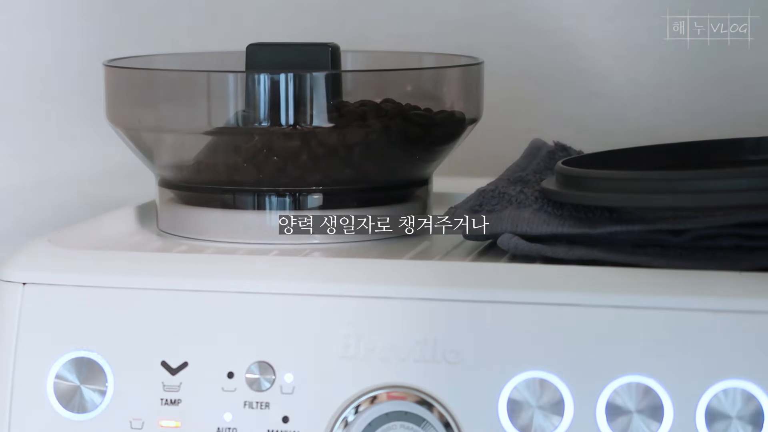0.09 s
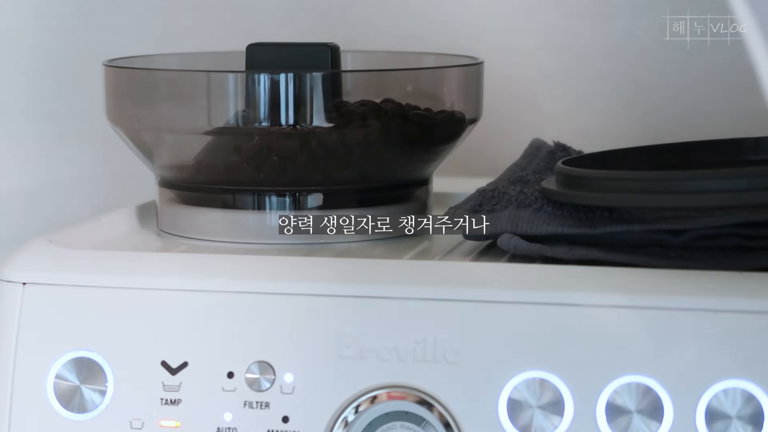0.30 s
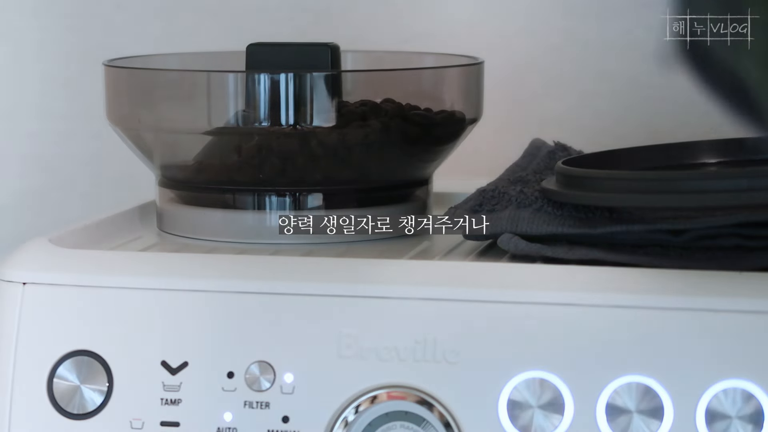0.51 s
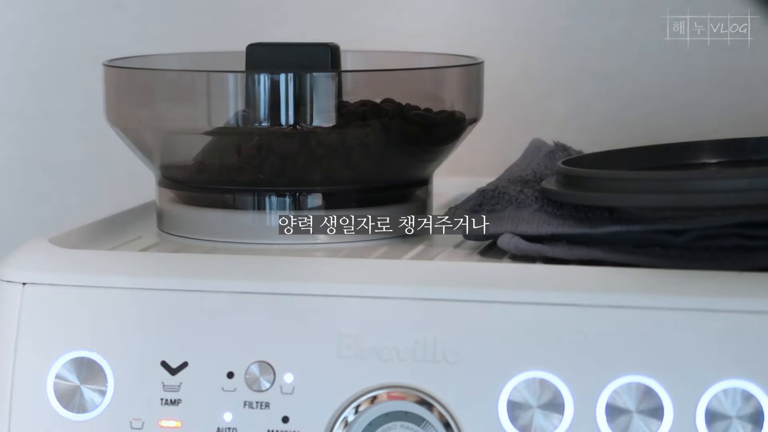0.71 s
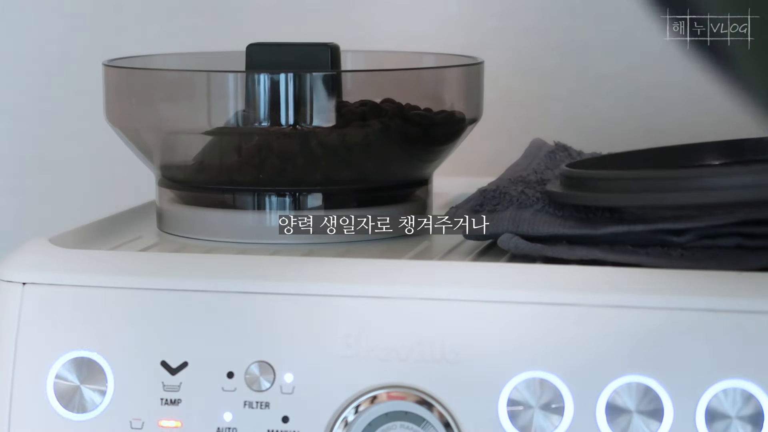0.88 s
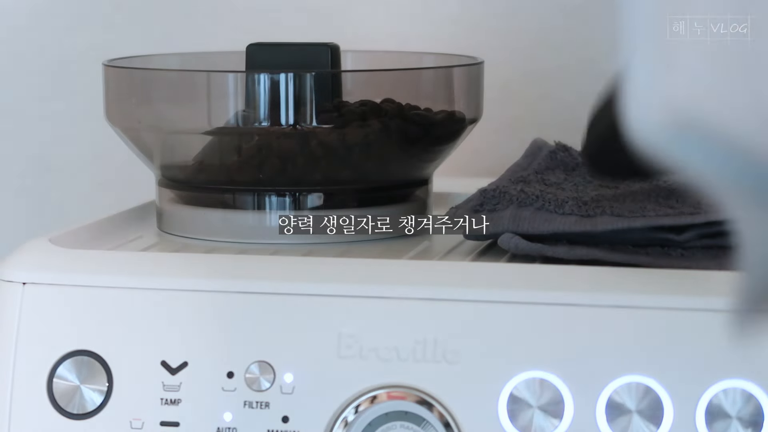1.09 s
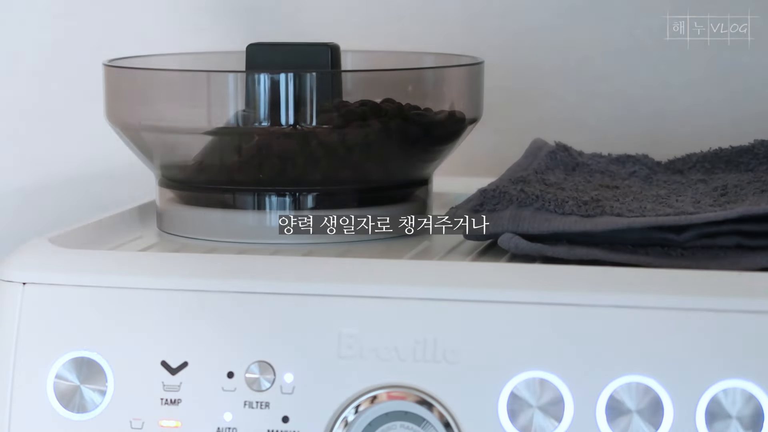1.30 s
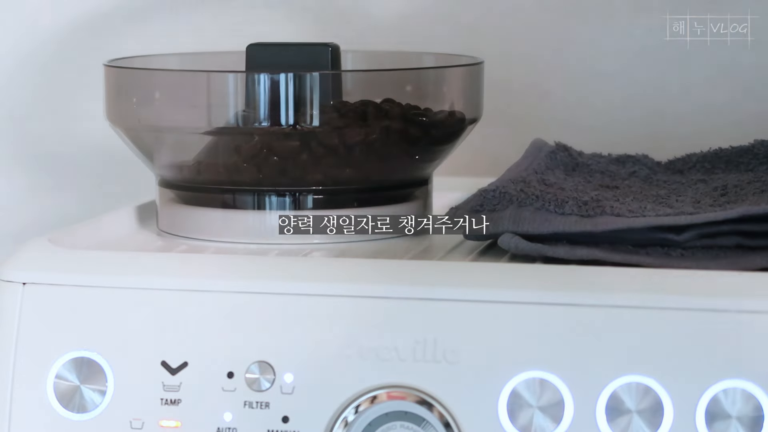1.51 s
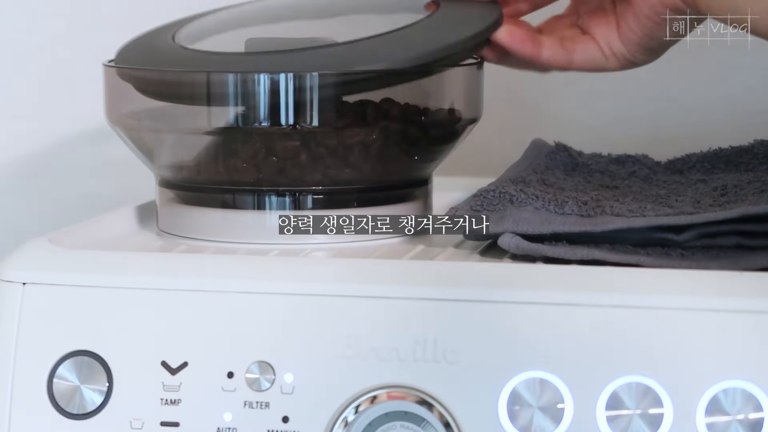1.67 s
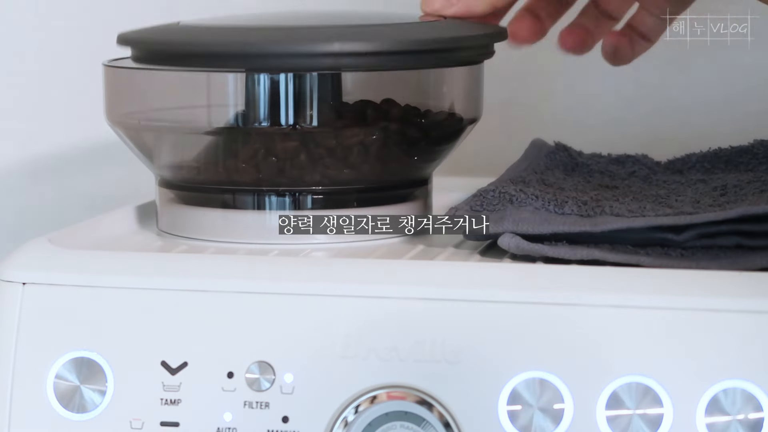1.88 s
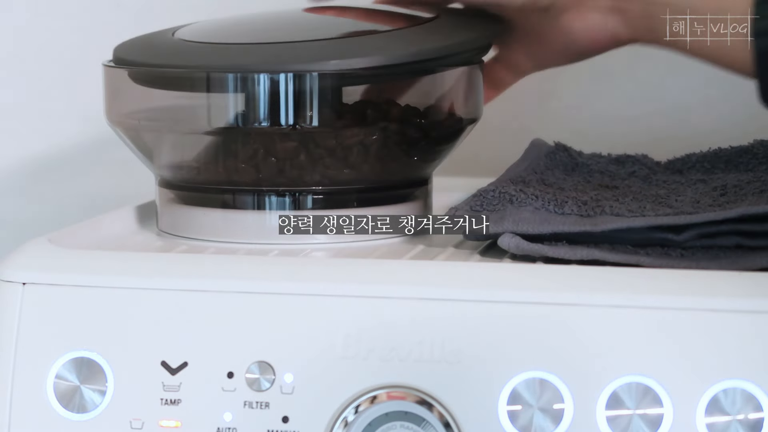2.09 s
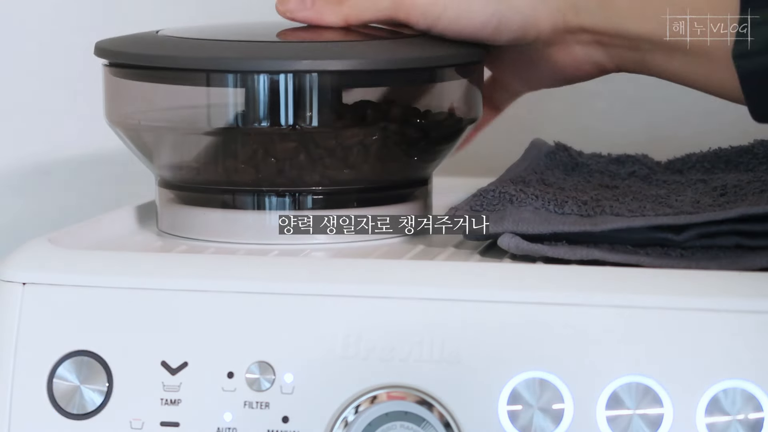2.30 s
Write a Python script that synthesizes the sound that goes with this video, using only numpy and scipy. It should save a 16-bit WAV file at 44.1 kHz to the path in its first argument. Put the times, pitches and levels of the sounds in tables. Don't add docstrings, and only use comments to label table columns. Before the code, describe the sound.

A plastic lid claps onto a bean hopper and is pressed down with dull clicks, after a container shuffles and knocks hard on the counter; close microphone, small quiet kitchen with faint fridge hum.

```python
import sys
import numpy as np
from scipy import signal
from scipy.fft import rfft, irfft
from scipy.io import wavfile

SR = 44100
rng = np.random.default_rng(int(sys.argv[2]) if len(sys.argv) > 2 else 0)


def store_wav(level_fs):
    pcm = np.round(np.clip(np.atleast_2d(level_fs), -1, 1) * 32767)
    wavfile.write(sys.argv[1], SR, pcm.T.astype(np.int16))


def convert_level_to_amplitude(level_db):
    exponent = np.asarray(level_db, float) / 20
    return 10 ** exponent


N = 110250
SEAT_S = 2.0

# start in seconds, mid crack in dB, body in dB, bright crack in dB, chatter in seconds.
LID_CONTACTS = [(1.7123, -24.5, -21, -32, 0.0013), (1.7176, -20, -43, -29, 0.0036),
                (1.7227, -51, -28, -28, 0.0013), (1.7645, -26.5, -22, -33, 0.0073),
                (1.77, -44, -32.5, -28.5, 0.0082), (1.7747, -38, -26, -41, 0.005),
                (1.781, -52, -28, -27, 0.0019), (1.785, -47, -52, -24, 0.0023),
                (2.1184, -42, -43.5, -47, 0.009), (2.1351, -40, -51, -37, 0.0035),
                (2.1532, -52, -53, -46, 0.0029), (2.168, -36.5, -44, -36, 0.0055),
                (2.1727, -47, -50, -35, 0.0028), (2.2615, -66, -43, -66, 0.0027),
                (2.3886, -38, -65, -46, 0.0044), (2.397, -37.5, -54, -37.5, 0.0056),
                (2.404, -34.5, -66, -35, 0.0045)]
# frequency in Hz, side level in dB.
SIDE_COLOUR = [(100, -29), (700, -19), (2400, -11.5), (8100, 1.5), (15000, 8)]


def colour(x, points):
    p, n = np.array(points, float), x.shape[-1]
    hz = np.maximum(np.arange(n // 2 + 1) * SR / n, 1)
    gain_db = np.interp(np.log(hz), np.log(p[:, 0]), p[:, 1])
    return irfft(rfft(x) * convert_level_to_amplitude(gain_db), n)


def band(x, lo_hz, hi_hz):
    return signal.sosfilt(signal.butter(N=2, Wn=[lo_hz, hi_hz], btype="band", fs=SR, output="sos"), x)


def unit(x):
    return x / np.sqrt(np.mean(x ** 2))


def peak_one(x):
    return x / np.abs(x).max()


def ring(modes, signs, size=8192):
    t = np.arange(size) / SR
    y = 0
    for (hz, db, t60), sign in zip(modes, signs):
        y = y + sign * convert_level_to_amplitude(db) * np.sin(2 * np.pi * hz * t) * convert_level_to_amplitude(-60 * t / t60)
    return peak_one(y)


def contacts(rows, modes, mid_db, body_db, bright_db, rim_db, rise_s, tick, size=8192):
    # frequency in Hz, level in dB, decay time T60 in seconds.
    rim_modes = [(2900, -4, .012), (4500, 0, .012), (6080, 0, .015), (7500, -3, .012), (9400, -5, .01)]
    ticks_per_s = 4000
    soft_tilt = 0.25
    out, t = np.zeros(N + 2 * size), np.arange(size) / SR
    blow = t * np.exp(-t / rise_s)
    for s, mid, body, bright, chatter_s in rows:
        chance = rng.random(size)
        noise = rng.standard_normal((2, size))
        body_vary, rim_vary, detune = rng.standard_normal((3, 14))
        fade = peak_one(np.exp(-t / max(chatter_s, 2e-4)) * (1 - np.exp(-t / rise_s)))
        push = fade * (noise[0] * (chance < ticks_per_s / SR) + 0.38 * noise[1])
        push[0] = -tick
        mid_crack = band(band(push, 900, 3500), 700, 4500)
        bright_crack = band(band(push, 3300, 10000), 2800, 15000)
        tilt = np.clip(soft_tilt * (body - mid), -4, 4)
        struck = [(hz * (1 + 0.057 * j), db - tilt * np.log2(hz / 500), t60)
                  for (hz, db, t60), j in zip(modes, detune)]
        force = 0.1 * push + blow / blow.sum()
        body_ring = signal.fftconvolve(force, ring(struck, -convert_level_to_amplitude(1.5 * body_vary)))[:size]
        rim_ring = signal.fftconvolve(push, ring(rim_modes, convert_level_to_amplitude(2.5 * rim_vary)))[:size]
        i = int(s * SR)
        out[i:i + size] += convert_level_to_amplitude(mid + mid_db) * peak_one(mid_crack)
        out[i:i + size] += convert_level_to_amplitude(body + body_db) * peak_one(body_ring)
        out[i:i + size] += convert_level_to_amplitude(bright + bright_db) * (peak_one(bright_crack) + convert_level_to_amplitude(rim_db) * peak_one(rim_ring))
    return out[:N]


def friction(curve, points, trim_db, grit_db):
    c, t = np.array(curve), np.arange(N) / SR
    unevenness = rng.exponential(size=N // 40 + 1).repeat(40)[:N]
    grains = rng.standard_normal(N) * convert_level_to_amplitude(grit_db * unevenness)
    pressure_db = np.interp(t, c[:, 0], c[:, 1], left=-120, right=-120)
    return unit(colour(grains, points)) * convert_level_to_amplitude(pressure_db + trim_db)


def notes(rows, rough, size=8192):
    out, t = np.zeros(N + size), np.arange(size) / SR
    for s, hz, db, scrape_s, t60 in rows:
        noise = np.sqrt(SR * scrape_s / 20) * rng.standard_normal(size)
        slip = np.sin(2 * np.pi * hz * t) + rough * noise
        scrape = slip * np.sin(np.pi * np.clip(t / scrape_s, 0, 1))
        y = signal.fftconvolve(scrape, ring([(hz, 0, t60)], (1,)))[:size]
        i = int(s * SR)
        out[i:i + size] += convert_level_to_amplitude(db) * peak_one(y)
    return out[:N]


def wander(rate_hz):
    return unit(signal.resample(rng.standard_normal(int(rate_hz * N / SR) + 2), N))


def air():
    # frequency in Hz, level in dB.
    air_colour = [(15, -32), (25, -11), (48, -7.5), (148, -15), (240, -10), (359, -15), (743, -15.5),
                  (12500, -43.5), (15600, -67)]
    # frequency in Hz, side minus mid in dB.
    air_side = [(60, -24), (200, -5), (400, -5.5), (4400, 0.5)]
    # time in seconds, swell in dB.
    air_swell = [(.7, 0), (1.0, 0), (1.4, 1), (1.7, -0.5), (2.0, -0.5), (2.5, -0.5)]
    # frequency in Hz, level in dB, frequency wander in Hz.
    hum_lines = [(57.7, -65, 2.82), (85, -73.5, 2.86), (111.4, -73, 2.1), (240.5, -60, 0.41),
                 (13100, -101, 2.5), (14600, -99, 1.5)]
    t = np.arange(N) / SR
    mid, side = colour(rng.standard_normal((2, N)), air_colour)
    level_db = -60.5 + np.interp(t, *np.array(air_swell).T)
    gain = convert_level_to_amplitude(level_db) / np.std(band(mid, 336, 18000))
    hum = 0
    for hz, db, wander_hz in hum_lines:
        level = convert_level_to_amplitude(db + 3 + 1.5 * wander(6))
        hum = hum + level * np.sin(2 * np.pi * np.cumsum(hz + wander_hz * wander(8)) / SR)
    return gain * mid + hum, gain * colour(side, air_side)


def shuffle():
    # time in seconds, level in dB.
    shuffle_curve = [(0, -44.5), (.035, -46), (.07, -46.5), (.12, -47.5), (.17, -45), (.215, -45.5)]
    # frequency in Hz, level in dB.
    shuffle_colour = [(88, -35), (150, -3), (459, -11), (1230, -5.5), (10800, -25.5), (15000, -22)]
    return friction(shuffle_curve, shuffle_colour, trim_db=-4.0, grit_db=-1.0)


def knocks():
    # start in seconds, mid crack in dB, body in dB, bright crack in dB, chatter in seconds.
    knock_rows = [(0.001, -33.5, -33.5, -61, 0.005), (0.029, -34, -33, -49, 0.0024),
                  (0.06, -33.5, -51, -39, 0.0063), (0.155, -41, -35, -49, 0.011),
                  (0.2208, -27.5, -26, -35, 0.012), (0.2262, -19, -20, -40, 0.0025),
                  (0.2455, -21.5, -22, -27, 0.0043), (0.2505, -18, -20.5, -26, 0.001),
                  (0.2574, -14.5, -24, -18.5, 0.0037), (0.263, -21, -36, -45, 0.0025),
                  (0.272, -22, -24, -44, 0.0033), (0.4016, -21, -19, -35.5, 0.0048),
                  (0.4065, -15.5, -30, -47, 0.001), (0.4392, -23, -27.5, -38, 0.007),
                  (0.452, -22.5, -29, -31, 0.0073), (0.4575, -30, -32, -25, 0.0045),
                  (0.4622, -11.5, -28, -21, 0.0028), (0.4655, -10.5, -17, -16, 0.0028),
                  (0.47, -37, -22.5, -36, 0.0038), (0.5018, -20.5, -22, -34, 0.0084),
                  (0.5065, -21, -22.5, -27.5, 0.0025), (0.534, -43, -21, -47, 0.0027)]
    # frequency in Hz, level in dB, decay time T60 in seconds.
    knock_modes = [(274, -21, 0.21), (343, -15.5, 0.09), (442, -10, 0.079), (503, 9, 0.044),
                   (677, 12, 0.022), (863, 4, 0.033), (967, -1.5, 0.065), (1288, 6, 0.025)]
    return contacts(knock_rows, knock_modes, mid_db=-1.0, body_db=-1.5, bright_db=1.5, rim_db=-57,
                    rise_s=0.000081, tick=3.26)


def rubbed_notes():
    # start in seconds, frequency in Hz, level in dB, scrape in seconds, T60 in seconds.
    knock_notes = [
        (.2215, 885, -22.5, .005, 0.028),
        (0.223, 440, -34, 0.0043, 0.026),
        (0.401, 422, -17, 0.0029, 0.022),
        (0.454, 1310, -21.5, 0.013, .015),
        (.453, 2120, -22, 0.0052, .01),
        (0.4615, 996, -22, 0.0053, 0.025),
        (.502, 420, -25.5, 0.0064, 0.034),
        (.548, 437, -35, .008, 0.037),
    ]
    lid_notes = [(1.0385, 1300, -30, .006, .012), (1.047, 870, -42.5, 0.0088, 0.022),
                 (1.044, 2010, -46, .004, .012), (1.2, 880, -55.5, .006, 0.03),
                 (1.7125, 363, -26.5, 0.0034, 0.027), (1.716, 256, -29, 0.0078, 0.068),
                 (1.7125, 590, -29.5, 0.0037, 0.035), (1.764, 202, -28.5, 0.017, 0.055),
                 (1.770, 528, -29.5, .008, 0.016), (1.767, 750, -29.5, 0.0049, 0.028),
                 (2.119, 512, -33, .009, 0.049), (2.3, 259, -49, 0.0059, 0.047),
                 (2.166, 514, -40, 0.0093, 0.035), (2.258, 498, -44.5, 0.0084, .04),
                 (2.36, 690, -49.5, 0.0073, 0.038)]
    rim_notes = [(1.780, 7530, -37, .009, 0.016), (1.781, 4930, -35, 0.011, 0.017),
                 (1.782, 6050, -38, 0.0079, .015), (1.780, 2870, -38, .01, .02),
                 (2.133, 4380, -45, 0.013, 0.014), (2.136, 3770, -50, .008, 0.017),
                 (2.168, 4390, -41, 0.0089, 0.028), (2.168, 5970, -44, 0.0067, 0.014),
                 (2.204, 6200, -59, 0.0099, 0.054), (2.390, 2990, -45, 0.0083, 0.013),
                 (2.396, 7300, -47.5, 0.0038, .012), (2.396, 5830, -44, 0.0055, 0.013),
                 (2.402, 6070, -43, .011, 0.011), (2.405, 9200, -64, 0.0074, 0.011)]
    return notes(lid_notes, rough=0.66) + notes(knock_notes, rough=0.66) + notes(rim_notes, rough=1.6)


def thuds():
    # start in seconds, level in dB.
    thud_rows = [(0.246, -42), (0.402, -42), (0.463, -40.5), (1.777, -32), (1.811, -34), (1.85, -37),
                 (1.89, -39), (2.129, -33), (2.142, -31), (2.163, -32.5), (2.21, -39), (2.279, -42),
                 (2.372, -35), (2.406, -29.5), (2.438, -37.5)]
    x = np.zeros(N)
    for s, db in thud_rows:
        x[int(s * SR)] = convert_level_to_amplitude(db)
    push = np.hanning(int(0.0038 * SR))
    thud = signal.fftconvolve(ring([(99, 0, 0.14)], (1,)), push / push.sum())
    return band(signal.fftconvolve(x, thud)[:N], 44, 300)


def lift():
    # start in seconds, mid crack in dB, body in dB, bright crack in dB, chatter in seconds.
    lift_rows = [
        (1.0385, -40, -54, -38, 0.006),
        (1.0415, -31.5, -42.5, -35, 0.0024),
        (1.05, -48, -57, -61, 0.019),
        (1.085, -56, -60.5, -57, 0.004),
    ]
    # frequency in Hz, level in dB, decay time T60 in seconds.
    lift_modes = [(927, -14, 0.1), (1160, -12, 0.02), (1310, -1, 0.014), (1490, 2, 0.011),
                  (1990, -10, 0.029)]
    return contacts(lift_rows, lift_modes, mid_db=-7.0, body_db=12.5, bright_db=-6.0, rim_db=-60,
                    rise_s=0.000087, tick=0.4)


def drag():
    # time in seconds, level in dB.
    drag_curve = [(1.04, -45), (1.06, -49.5), (1.08, -58.5), (1.15, -73)]
    drag_colour = [(500, -14), (800, 3.0), (1400, -0.5), (2200, -6.5), (3000, -25)]  # (Hz, dB)
    return friction(drag_curve, drag_colour, trim_db=-0.5, grit_db=0.5)


def drop():
    # frequency in Hz, level in dB, decay time T60 in seconds.
    lid_modes = [(212, -32, 0.025), (277, -9.5, 0.045), (369, -1.5, 0.011), (503, 5.5, 0.03),
                 (754, 9, 0.014), (1420, -23, 0.013)]
    dropped = [row for row in LID_CONTACTS if row[0] < SEAT_S]
    return contacts(dropped, lid_modes, mid_db=-3.5, body_db=-1.5, bright_db=-12.5, rim_db=1.5,
                    rise_s=0.00019, tick=1.0)


def rub():
    # time in seconds, level in dB.
    rub_curve = [(1.762, -45), (1.77, -42), (1.785, -35.5), (1.81, -53), (1.87, -56), (1.95, -87)]
    # frequency in Hz, level in dB.
    rub_colour = [(1500, -7.5), (3000, -4), (5500, -2), (12000, -11.5), (15000, -19)]
    return friction(rub_curve, rub_colour, trim_db=-2.5, grit_db=0.0)


def seat():
    # frequency in Hz, level in dB, decay time T60 in seconds.
    seat_modes = [(240, -12, .04), (440, -12, 0.02), (505, 2, 0.055), (710, -22, 0.026)]
    seated = [row for row in LID_CONTACTS if row[0] > SEAT_S]
    return contacts(seated, seat_modes, mid_db=-7.5, body_db=0.0, bright_db=-5.5, rim_db=-35,
                    rise_s=0.00077, tick=0.1)


def press():
    # time in seconds, level in dB.
    press_curve = [(2.11, -64), (2.15, -47), (2.23, -64.5), (2.36, -59.5), (2.5, -66.5)]
    press_colour = [(200, 11.5), (500, 8), (1500, -20), (5000, -12.5), (12000, -46)]  # (Hz, dB)
    return friction(press_curve, press_colour, trim_db=2.5, grit_db=-0.3)


def room(x):
    # frequency in Hz, decay time T60 in seconds.
    room_t60 = [(150, 0.36), (500, 0.49), (2000, 0.32), (6000, 0.29), (12000, 0.18)]
    first_echo_s, room_db = 0.0017, -8
    t, p = np.arange(SR // 2) / SR, np.array(room_t60)
    tail = 0
    for hz in 90 * 2. ** np.arange(8):
        octave = band(rng.standard_normal((2, len(t))), hz / 2 ** .5, hz * 2 ** .5)
        t60 = np.interp(np.log(hz), np.log(p[:, 0]), p[:, 1])
        tail = tail + octave * convert_level_to_amplitude(-60 * t / t60)
    tail = tail * np.clip(t / first_echo_s - 1, 0, 1)
    tail = tail / np.sqrt((tail[0] ** 2).sum()) * convert_level_to_amplitude(room_db)
    mid = signal.fftconvolve(x, tail[0])[:N]
    side = signal.fftconvolve(x, tail[1])[:N]
    return mid, colour(side, SIDE_COLOUR)


def scene():
    # frequency in Hz, level in dB.
    mic_colour = [(100, 1.5), (3000, 0), (5000, 2.5), (8000, -2.5), (11000, -3.5), (14500, -3.5)]
    near = shuffle() + knocks() + thuds() + lift() + drag() + drop() + rub() + seat() + press()
    near = colour(band(near, 141, 14700), mic_colour)
    sung = rubbed_notes()
    wet_mid, wet_side = room(near + convert_level_to_amplitude(-6.5) * sung)
    near = near + sung
    air_mid, air_side = air()
    mid = near + wet_mid + air_mid
    near_side = colour(signal.hilbert(near).imag, SIDE_COLOUR) * convert_level_to_amplitude(-4.5)
    side = near_side + wet_side + air_side
    return np.array([mid + side, mid - side])


def low_pass(x):
    return signal.sosfilt(signal.butter(12, 15700, fs=SR, output="sos"), x)


def record(dry):
    cut = signal.sosfilt(signal.ellip(8, .2, 70, 15500, fs=SR, output="sos"), dry)
    return low_pass(cut)


dry = scene()
out = record(dry)
store_wav(out)
```